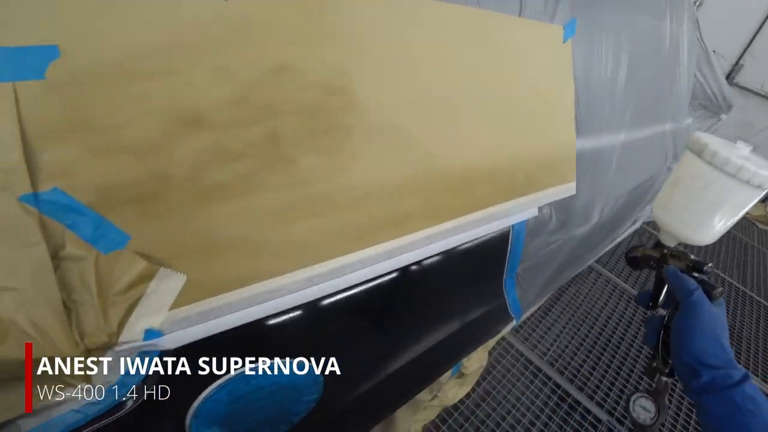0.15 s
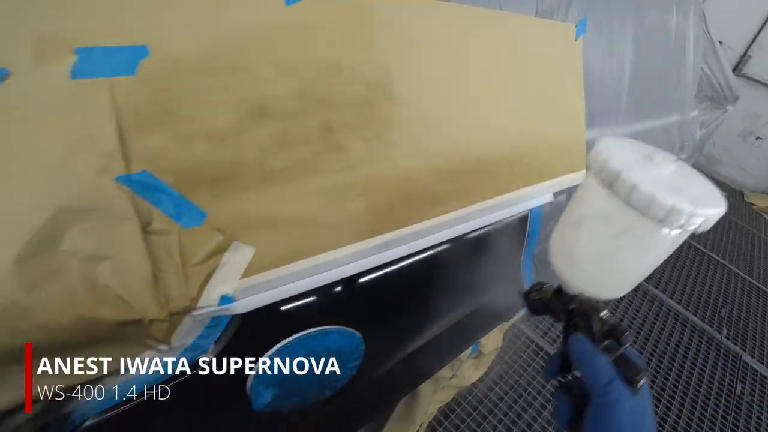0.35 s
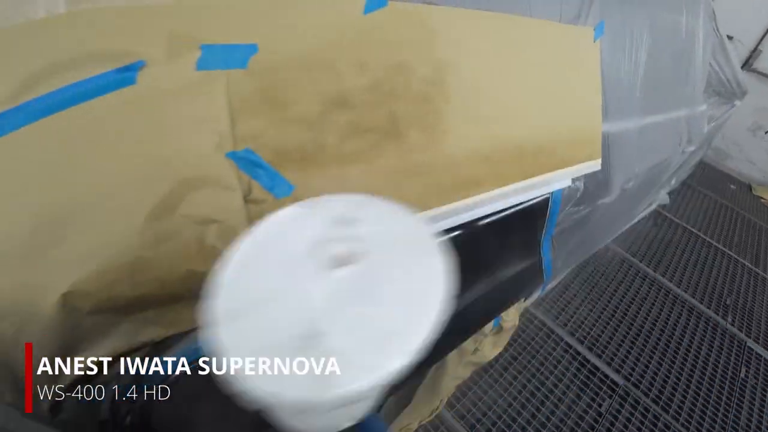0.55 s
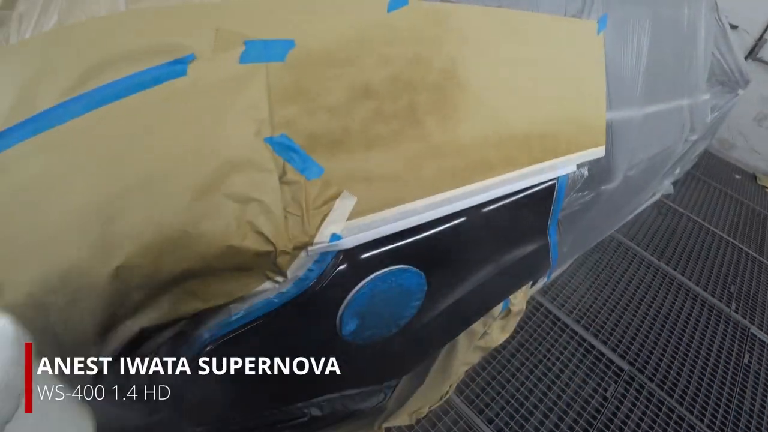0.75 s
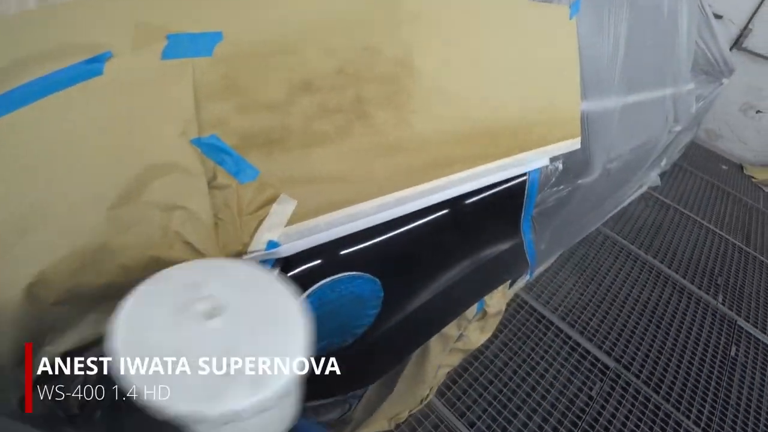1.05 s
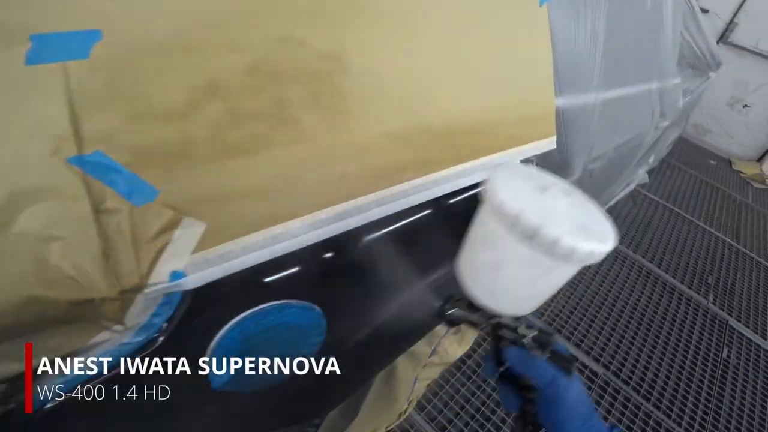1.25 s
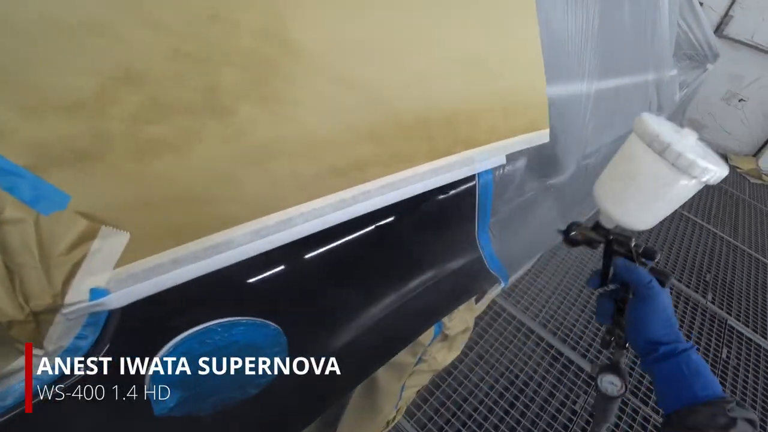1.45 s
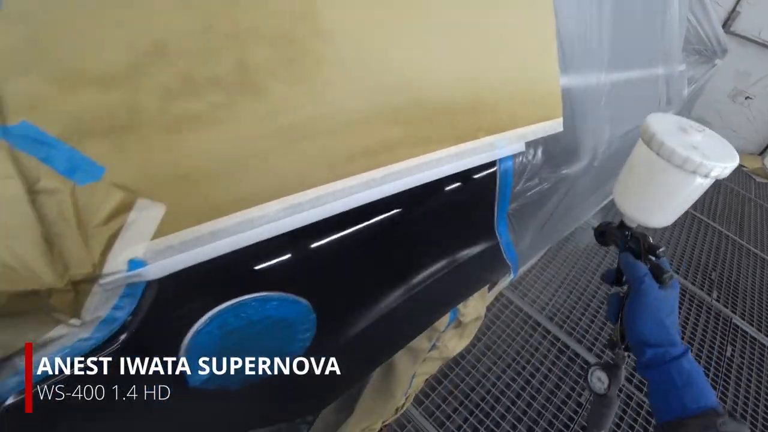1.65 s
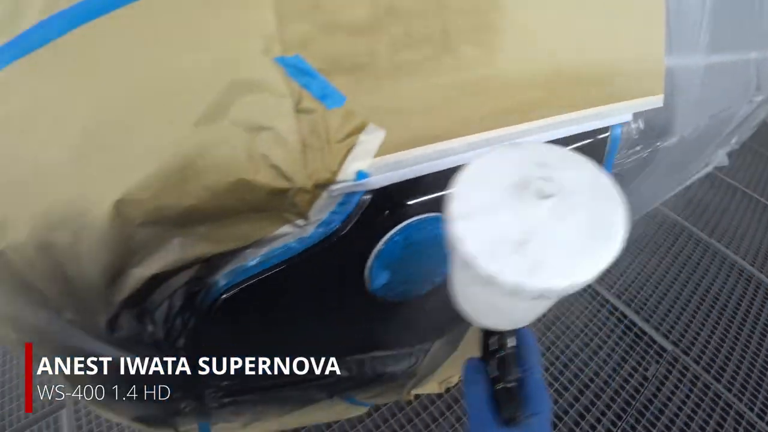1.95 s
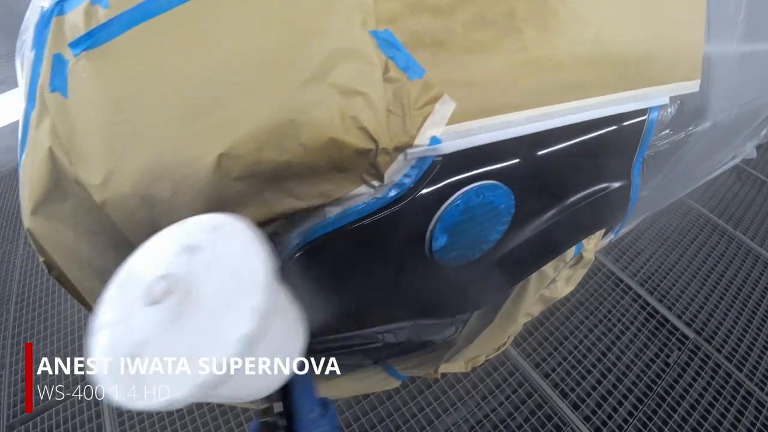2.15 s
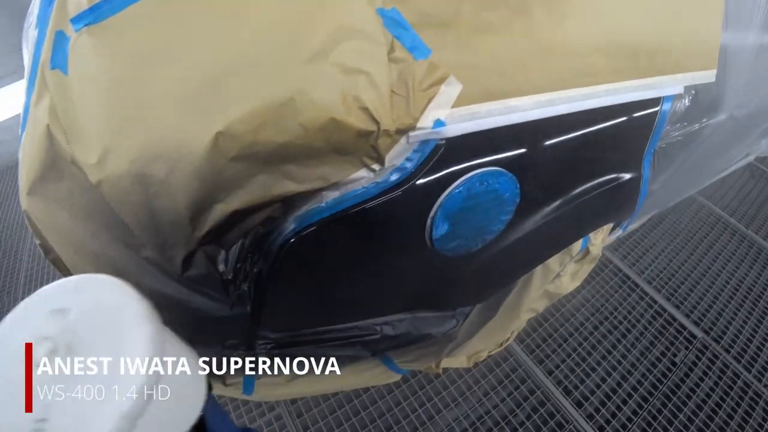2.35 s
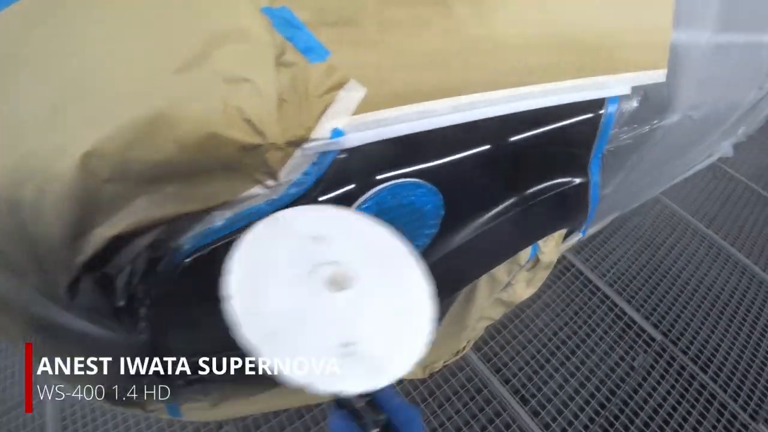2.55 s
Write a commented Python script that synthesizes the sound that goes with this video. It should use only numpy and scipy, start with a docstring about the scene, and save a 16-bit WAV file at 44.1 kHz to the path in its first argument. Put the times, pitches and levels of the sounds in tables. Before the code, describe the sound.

Sharp, airy spray gun hiss in a metal paint booth, recorded close in stereo: four short gaps split the strokes, with soft puffs at some closings, rougher roar near edges and extraction fan hum beneath.

```python
"""Inside a metal paint booth, a spray gun sweeps back and forth along a car door, close to the microphone.
The air jet is fluttering noise: it hisses, is combed by its echo off the panel, and roars lower where it
strikes edges and masking paper. The trigger is let go at each turn, with puffs at two of the closings;
the booth rings out as decaying noise, and gain control lifts the extraction fan's rush and hum."""
import sys
import numpy as np
from scipy import signal
from scipy.fft import irfft
from scipy.io import wavfile
from scipy.ndimage import uniform_filter1d

SR = 44100
rng = np.random.default_rng(int(sys.argv[2]) if len(sys.argv) > 2 else 0)


def bounce(signal):
    """Save signal as a 16-bit WAV file at the path given by the first command-line argument."""
    frames = np.transpose(np.atleast_2d(signal))
    limited = np.clip(frames, -1, 1)
    pcm = np.round(limited * 32767).astype(np.int16)
    wavfile.write(sys.argv[1], SR, pcm)


N = 119070
WINDOW, HOP = 512, 128  # samples
TIME_S = np.arange(N) / SR
FRAME_S = np.arange(N // HOP + 3) * HOP / SR
BIN_HZ = np.fft.rfftfreq(WINDOW, 1 / SR)

# gun sweep: time_s, hiss_db, extra_treble_db, left_over_right_db
SWEEP = [(0.02, -27, 1.5, 2.3), (0.07, -26.5, -0.5, 0), (0.21, -28, -1.2, -0.4), (0.3, -25.5, -0.7, 0.2),
         (0.42, -24, -1, -0.1), (0.56, -25, -0.1, 1.7), (0.66, -24.5, -4.5, 2.9), (0.74, -25.7, -3, 4),
         (0.83, -27.5, -2.5, 5), (1.01, -31, 0, 5), (1.09, -25.5, -6, 4), (1.18, -26, -4.5, 4.5),
         (1.24, -24, -4.5, 2.5), (1.42, -25.5, 1, 0.5), (1.57, -27, -0.3, 2), (1.7, -27, 0.3, -0.2),
         (1.85, -26.3, 0, 0), (2.04, -27.5, 4.5, 0.8), (2.11, -25, -1.5, 1.3), (2.21, -25, -2.5, 2.5),
         (2.29, -26.0, -1.4, 3), (2.46, -28.5, -0.8, 4), (2.54, -28.5, -1.5, 4), (2.62, -26, -4.5, 3.6),
         (2.68, -25.5, -5.5, 3)]


def amp(db):
    """Decibels to gain."""
    return 10 ** (np.asarray(db) / 20)


def evened(x):
    """Scales to rms 1."""
    return x / np.sqrt(np.mean(x ** 2) + 1e-20)


def read(points, hz):
    """Interpolates a curve on a log-frequency axis."""
    point_hz, value = np.transpose(points)
    return np.interp(np.log(hz + 1), np.log(point_hz + 1), value)


def follow(table, time_s):
    """Interpolates every column of a control table at the given times."""
    point_s, *columns = np.transpose(table)
    return [np.interp(time_s, point_s, column) for column in columns]


def to_sound(z):
    """Short-time spectra (frames, bins) to samples."""
    return signal.istft(z.swapaxes(-1, -2), nperseg=WINDOW, noverlap=WINDOW - HOP)[1][..., :N]


def ports(likeness, shape):
    """Complex noise at two microphone ports; likeness is their correlation."""
    a, b = rng.standard_normal((2, *shape)) + 1j * rng.standard_normal((2, *shape))
    likeness = np.clip(likeness, -1, 1)
    return np.array([a, likeness * a + np.sqrt(1 - likeness ** 2) * b])


def noise(spectrum):
    """Steady coloured noise, rms 1, with the port correlation of a diffuse field (sinc of spacing)."""
    port_spacing_m, sound_speed_m_s = 0.036, 360
    hz = np.fft.rfftfreq(N, 1 / SR)
    likeness = np.sinc(2 * hz * port_spacing_m / sound_speed_m_s)
    return evened(irfft(ports(likeness, hz.shape) * amp(read(spectrum, hz)), N))


def trigger():
    """Nozzle air flow, 0-1: the valve ramps open and shut, then air left in the nozzle bleeds off."""
    # trigger pulls: open_s, shut_s
    strokes = [(-.3, 0.091), (0.187, 0.86), (0.983, 1.5976), (1.675, 2.322), (2.433, 2.9)]
    open_ramp_s, shut_ramp_s = .014, .016
    bleed_db, bleed_decay_s = -8.5, 0.016
    flow = np.zeros(N)
    for open_s, shut_s in strokes:
        opening = np.clip((TIME_S - open_s) / open_ramp_s + .5, 0, 1)
        closing = np.clip((shut_s - TIME_S) / shut_ramp_s + .5, 0, 1)
        bleed = amp(bleed_db) * np.exp(-np.maximum(TIME_S - shut_s, 0) / bleed_decay_s)
        flow += opening * np.maximum(closing, bleed)
    return flow


def bearing():
    """Gun crossing the microphone: port level difference, and phase difference in the treble."""
    # port imbalance: freq_hz, left_over_right_db
    port_tilt = [(7800, -1), (9000, 1.3), (16000, -0.5)]
    # port phase: freq_hz, lead_rad_per_db of pan
    lead = [(6500, 0), (9000, 0.32), (12000, 0.51), (16000, .5)]
    ahead_db = 1  # pan at which the ports are in phase
    pan_db = follow(SWEEP, FRAME_S)[2][:, None]
    gain = amp((pan_db + read(port_tilt, BIN_HZ)) / 2)
    half = gain * np.exp(.5j * (pan_db - ahead_db) * read(lead, BIN_HZ))
    return np.array([half, 1 / half])


def turbulence(spectrum, flutter_db, colour):
    """Air noise fluttering as a whole and in time-frequency patches; rms 1 before colour and bearing."""
    # direct sound at the ports: freq_hz, left_right_likeness
    alike = [(300, 0.99), (640, 0.78), (1400, 0.82), (3100, 1), (7000, 1), (15000, 1)]
    patchy_db = 1.23
    shape = len(FRAME_S), len(BIN_HZ)
    flutter = evened(uniform_filter1d(rng.standard_normal(len(FRAME_S)), size=4))[:, None]
    patches = uniform_filter1d(rng.standard_normal(shape), size=5, axis=0)
    patches = evened(uniform_filter1d(patches, size=14, axis=1))
    level_db = read(spectrum, BIN_HZ) + flutter_db * flutter + patchy_db * patches
    z = ports(read(alike, BIN_HZ), shape) * amp(level_db)
    return to_sound(z * colour * bearing()) / to_sound(z).std()


def panel_comb():
    """Magnitude of direct sound plus a delayed panel echo: a comb that moves with the lag."""
    # panel echo, strong over flat metal, weak by the wheel arch: time_s, lag_ms, strength
    echo = [(0, .405, .3), (.2, .36, .3), (.3, .365, .3), (.4, .41, .28), (.56, .5, .26), (.7, .46, .12),
            (1.15, .5, .1), (1.25, .44, .18), (1.4, .4, .24), (1.55, .33, .22), (1.7, .325, .22),
            (1.82, .355, .28), (2.02, .4, .26), (2.11, .5, .22), (2.2, .52, .22), (2.32, .41, .2),
            (2.52, .4, .1), (2.7, .42, .26)]
    # panel reflection, strongest in the lows, weakening towards the treble: freq_hz, share_of_strength
    mirror = [(1000, 1.1), (4500, .75), (10000, .65), (15000, .4)]
    lag_ms, strength = follow(echo, FRAME_S[:, None])
    delay = np.exp(-2j * np.pi * BIN_HZ * lag_ms / 1000)
    return abs(1 + strength * read(mirror, BIN_HZ) * delay)


def jet():
    """Nozzle hiss and landing roar, both combed by the panel echo and gated by the trigger."""
    # nozzle hiss spectrum: freq_hz, relative_db_per_hz
    hiss_spectrum = [(200, -98), (700, -53), (1350, -18), (1800, -17), (3000, -13), (4500, -7.5),
                     (6000, -2.5), (7000, 0), (7900, 1.5), (9100, -2), (10400, 0.5), (12000, -1.5),
                     (14000, -5.5), (16000, -7.5)]
    # jet striking the work: freq_hz, relative_db_per_hz
    roar_spectrum = [(80, -10), (250, -7), (600, -5.5), (1100, 1), (1380, -9), (1700, -1), (2400, -1),
                     (4000, 3.5), (6000, 0), (9000, -27.5), (16000, -40)]
    # roar, low over flat metal, high crossing onto wheel arch and paper: time_s, level_db
    landing = [(0, -42), (.2, -50), (.3, -39.5), (.57, -41.5), (.65, -33.5), (.74, -39), (1.02, -43),
               (1.1, -36.5), (1.195, -36), (1.225, -45), (1.55, -43.5), (2.03, -44.5), (2.105, -33.5),
               (2.23, -38.5), (2.29, -43), (2.5, -39.5), (2.63, -36.5), (2.68, -46)]
    shelf_from_hz, shelf_full_hz = 7500, 12000
    comb = panel_comb()
    hiss_db, treble_db, _ = follow(SWEEP, FRAME_S[:, None])
    shelf = read([(shelf_from_hz, 0), (shelf_full_hz, 1)], BIN_HZ)
    hiss = turbulence(hiss_spectrum, -0.14, comb * amp(hiss_db + treble_db * shelf))
    roar_db = follow(landing, FRAME_S[:, None])[0]
    roar = turbulence(roar_spectrum, .8, comb * amp(roar_db))
    return trigger() * (hiss + roar)


def booth(x, count=7):
    """Diffuse metal-booth ring: noise tails whose treble dies first, crossfaded evenly in turn over time."""
    # booth decay: freq_hz, t60_s
    decay = [(200, 0.97), (1500, 0.82), (4000, 0.56), (8000, 0.36), (12000, 0.24), (16000, 0.25)]
    out = np.zeros((2, N))
    for k in range(count):  # several tails, so that no fixed colouring stands out
        white = noise([(0, 0), (1, 0)])[:, :SR // 2]
        hz, t, z = signal.stft(white, SR, nperseg=WINDOW)
        fade = amp(-60 * t / read(decay, hz)[:, None])
        tail = signal.istft(z * fade, SR, nperseg=WINDOW)[1]
        here = np.sqrt(np.maximum(1 - abs(np.linspace(0, count - 1, N) - k), 0))
        out += signal.fftconvolve(x * here, tail / np.linalg.norm(tail[0]), axes=1)[:, :N]
    return out


def fan():
    """Extraction fan: diffuse low-weighted air rush plus tones wavering in pitch and strength."""
    # air rush: freq_hz, relative_db_per_hz
    rush = [(18, -8), (36, -0.5), (52, -2), (88, 2.5), (125, 0.5), (190, -4.5), (400, -8.5), (700, -14),
            (1300, -16), (3000, -23), (8000, -42), (16000, -59)]
    # fan tones: pitch_hz, rms_db
    tones = [(86.1, -61), (284, -64.5), (517, -67.5), (613, -67)]
    rush_db, wander_hz, waver_depth = -52.5, 1.96, 0.24
    out = amp(rush_db) * noise(rush)
    for pitch_hz, level_db in tones:
        drift = uniform_filter1d(rng.standard_normal((2, N)), size=3000)
        wander, waver = evened(uniform_filter1d(drift, size=1500))
        turns = np.cumsum(pitch_hz + wander_hz * wander) / SR + rng.random()
        out += amp(level_db) * evened((1 + waver_depth * waver) * np.sin(2 * np.pi * turns))
    return out


def spits():
    """Puffs from the closing valve: noise under a fast rise and exponential fade."""
    # puffs: start_s, level_db
    puffs = [(0.871, -33.5), (0.885, -38), (2.348, -43.5)]
    # puff spectrum: freq_hz, relative_db_per_hz
    puff_spectrum = [(300, 0), (2000, -2.5), (5500, 7), (8000, 0.5), (16000, -17)]
    rise_s, fade_s = 0.0005, 0.012
    level = np.zeros(N)
    for start_s, level_db in puffs:
        age_s = np.maximum(TIME_S - start_s, 0)
        level += amp(level_db) * np.minimum(age_s / rise_s, 1) * np.exp(-age_s / fade_s)
    return level * noise(puff_spectrum)


def scene():
    """Gun, its booth ring (fed from the left port) and the fan."""
    booth_db = -14.5
    gun = jet() + spits()
    return gun + amp(booth_db) * booth(gun[:1]) + fan()


def record(dry):
    """Quick gain control, driven by smoothed power, holds the hiss down; then a low-pass."""
    knee_db, squeeze_db_per_db, makeup_db, sense_s = -40, .42, 5.2, .007
    edge_hz = 15720
    r = np.exp(-1 / (sense_s * SR))
    power = (dry ** 2).mean(0)
    sensed = signal.lfilter([1 - r], [1, -r], power, zi=[power[:WINDOW].mean()])[0]
    over_db = np.maximum(10 * np.log10(sensed + 1e-12) - knee_db, 0)
    held = dry * amp(makeup_db - squeeze_db_per_db * over_db)
    low_pass = signal.firwin(511, edge_hz, window=("kaiser", 9), fs=SR)
    return signal.oaconvolve(held, low_pass[None], "same")


dry = scene()
out = record(dry)
bounce(out)
```